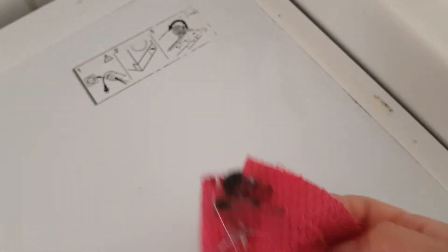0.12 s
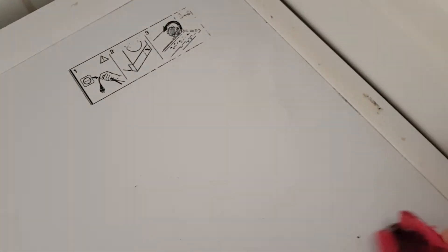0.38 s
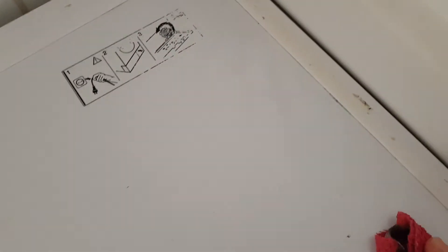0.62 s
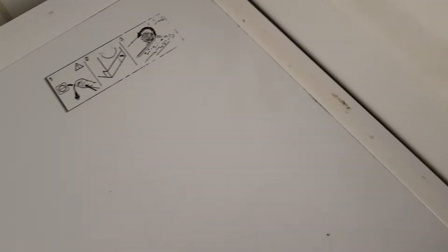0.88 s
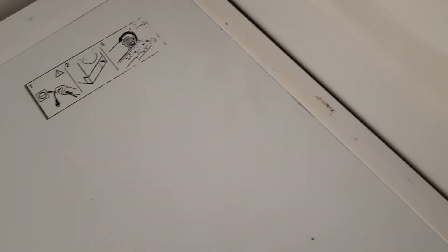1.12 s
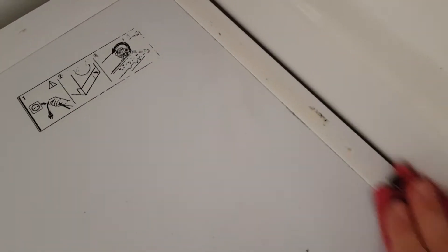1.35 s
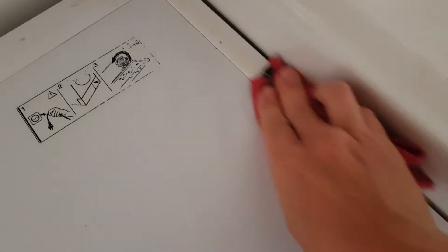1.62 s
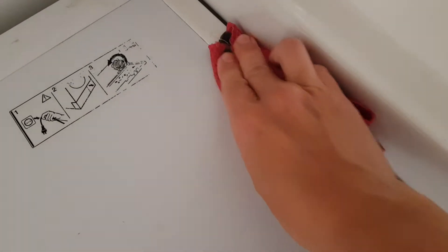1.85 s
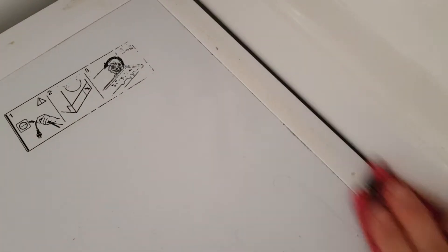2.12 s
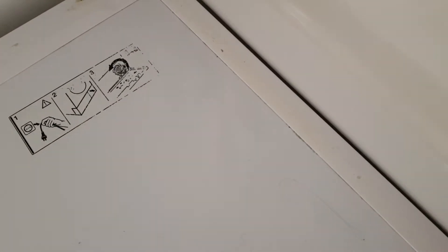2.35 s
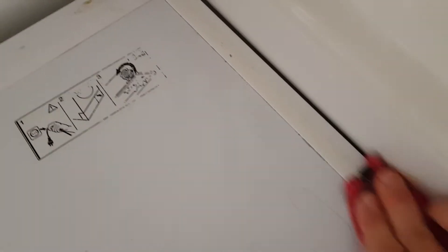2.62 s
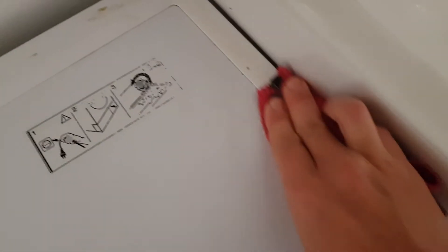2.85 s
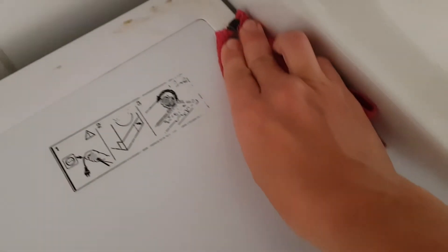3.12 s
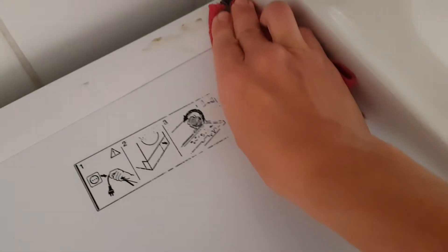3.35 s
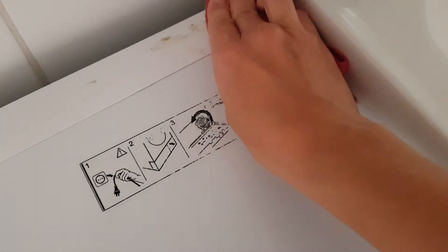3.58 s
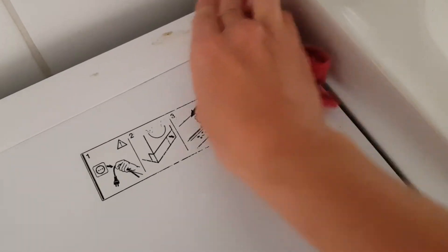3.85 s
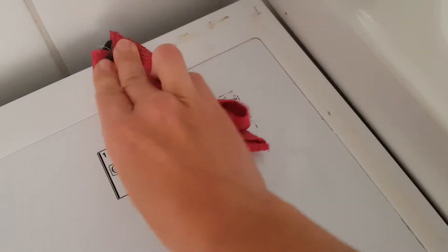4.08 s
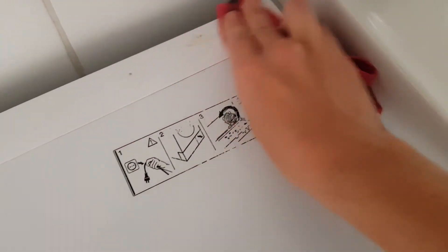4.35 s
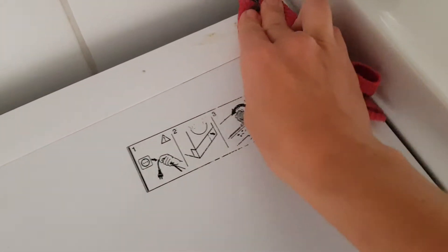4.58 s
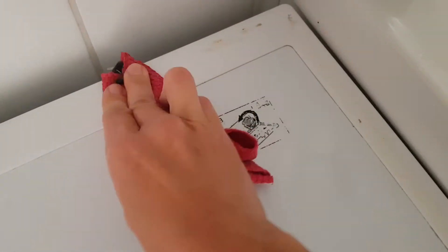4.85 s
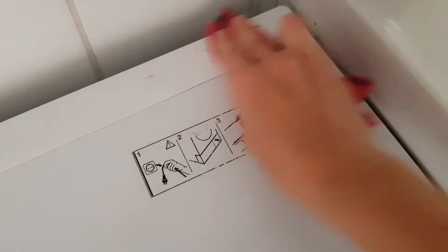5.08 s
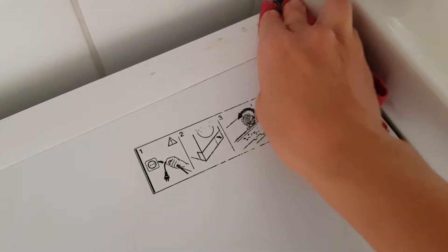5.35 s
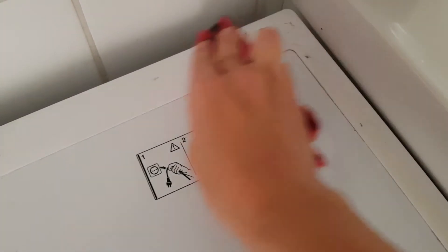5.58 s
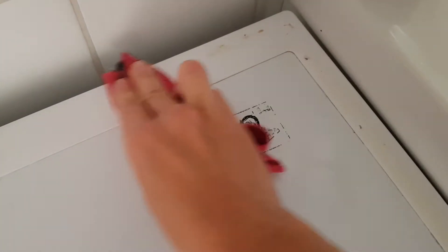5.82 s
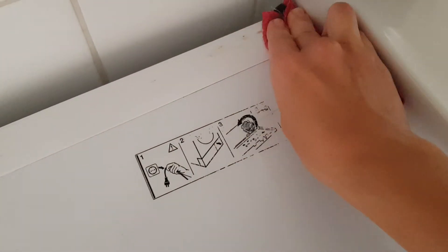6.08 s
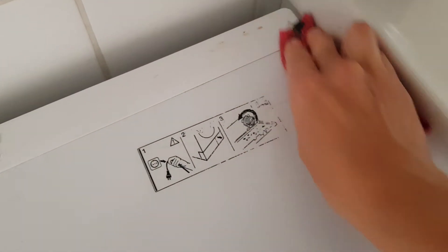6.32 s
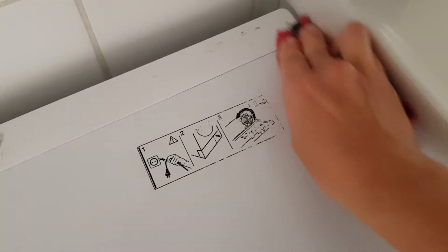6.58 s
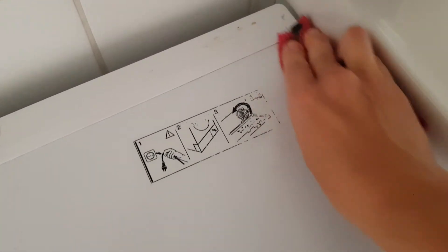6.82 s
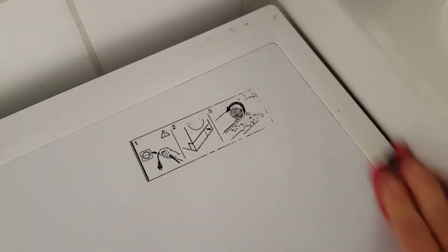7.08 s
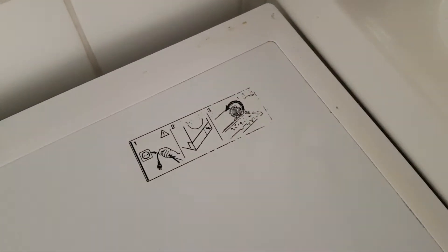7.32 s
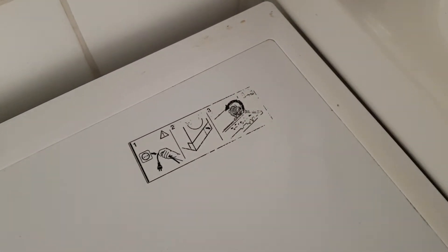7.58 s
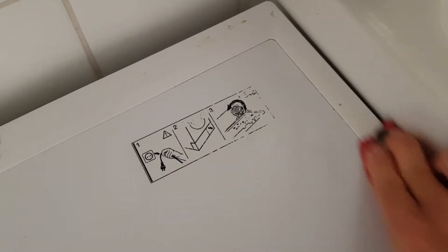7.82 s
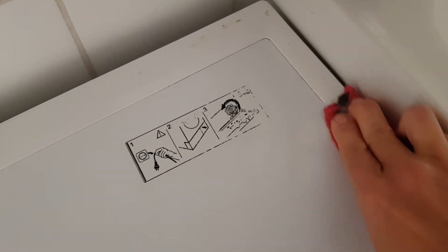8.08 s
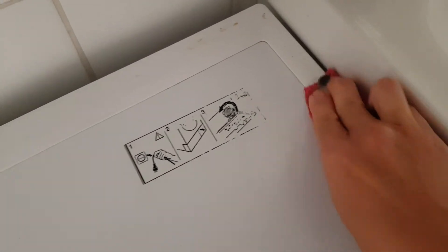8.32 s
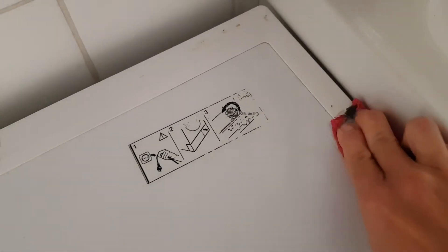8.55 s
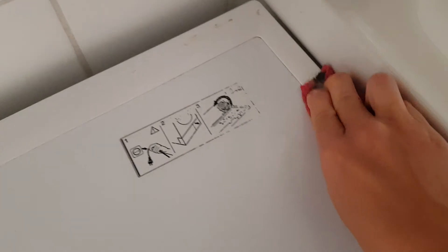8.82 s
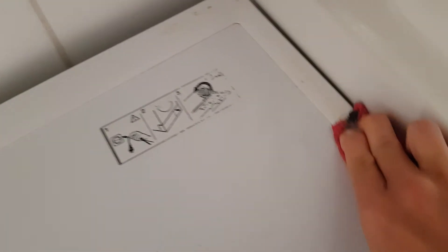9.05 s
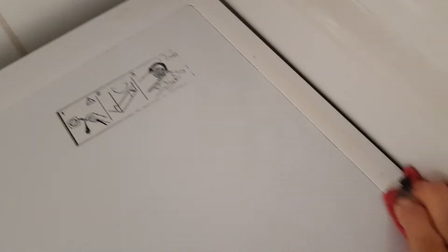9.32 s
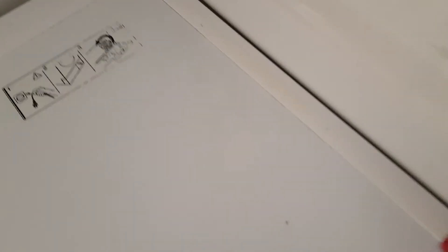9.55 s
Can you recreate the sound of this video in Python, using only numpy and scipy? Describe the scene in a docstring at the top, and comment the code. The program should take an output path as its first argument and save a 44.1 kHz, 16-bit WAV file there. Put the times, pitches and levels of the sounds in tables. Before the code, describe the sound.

A close hand-held stereo phone hears a cloth rubbing a machine's top panel indoors. Faint strokes soon become strong, dry hisses, dipping at each turn, over deep drum rumble and uneven laundry thumps. The heaviest thumps come around six to seven seconds; then the drum fades out and quiet, hollow, wavering rubs continue over faint hiss.

```python
"""First comes the low rumble of a laundry machine's drum, already turning, under the hiss of a scrubbing cloth.
Place: a small tiled room; a hand scrubs the machine's top panel. Microphone: a hand-held phone, two capsules.
Rumble and the load's drops (several a turn and uneven, the heaviest about once a turn) ring the cabinet's modes.
Each stroke is noise that swells with the hand's speed and falls quiet at its turn; a ledge echoes it from
about 20 cm of extra path. The drum coasts to a stop, and the cloth then rings the panel with a hollow tone."""
import sys
import numpy as np
from scipy import signal
from scipy.fft import rfft, irfft, next_fast_len
from scipy.io import wavfile
from scipy.ndimage import uniform_filter1d

SR = 44100
rng = np.random.default_rng(int(sys.argv[2]) if len(sys.argv) > 2 else 0)


def ratio(d):
    """dB to gain"""
    e = np.asarray(d, float) / 20
    return 10 ** e


def transcribe(u):
    """Save the signal u as a 16-bit wav file named by the first command-line argument.

    u: samples, shape (n,) or (channels, n), limited to [-1, 1]; the rate is SR.
    q: integer samples, one column per channel.
    """
    v = np.clip(np.atleast_2d(u).T, -1, 1)
    q = np.round(v * 32767).astype(np.int16)
    wavfile.write(sys.argv[1], SR, q)


N = 426883

T = np.arange(N) / SR
SIZE = next_fast_len(N + SR)
HZ = np.maximum(np.fft.rfftfreq(SIZE, 1 / SR), 1)


def through(x, response):
    """Filter by a frequency response."""
    return irfft(rfft(x, SIZE) * response, SIZE)[..., :N]


def shape(points):
    """Gain of (f/Hz, level/dB) points on a log-frequency axis."""
    hz, db = np.transpose(points)
    return ratio(np.interp(np.log(HZ), np.log(hz), db))


def modes(table):
    """Response of damped resonances (f/Hz, width/Hz, level/dB); neighbours alternate in sign."""
    response = 0
    for k, (hz, width, db) in enumerate(table):
        damping = 1j * HZ * width
        response = response + (-1) ** k * ratio(db) * damping / (hz ** 2 - HZ ** 2 + damping)
    return response


def unit(response):
    """Scale a response so that white noise comes out at rms 1."""
    return response / np.sqrt(np.mean(np.abs(response) ** 2))


def curves(table):
    """Columns after t/s, one value a sample."""
    s, *columns = np.transpose(table)
    return [np.interp(T, s, column) for column in columns]


def flicker(rate, depth_db):
    """A gain of rms 1 whose level wanders rate times a second."""
    k = int(SR / rate)
    held = np.repeat(rng.standard_normal(N // k + 1), k)[:N]
    gain = ratio(depth_db * uniform_filter1d(held, k))
    return gain / np.sqrt(np.mean(gain ** 2))


# sound that the two capsules do not share: (f/Hz, level/dB relative to the shared part)
UNSHARED = [(40, -6), (125, -24.5), (250, -10), (500, -8), (1000, -2.5), (2000, -2.5)]


def pair(drive, response):
    """Noise under one envelope: a part that both microphones share and a part that they do not."""
    shared, unshared = rng.standard_normal((2, N)) * drive
    side = through(unshared, response * shape(UNSHARED))
    return through(shared, response) + side * np.array([[1], [-1]])


def blows(times, gains, push_s):
    """Soft half-sine pushes; the longer the contact, the duller the blow."""
    hits = np.zeros(N)
    hits[(np.asarray(times) * SR).astype(int)] = gains
    length = int(push_s * SR)
    push = np.sin(np.pi * np.arange(length) / length)
    return signal.fftconvolve(hits, push)[:N]


# load dropping in the drum: (t/s, upper-mode level/dB before trims, low-mode relative level/dB, fall/s)
DROPS = [(0.04, -29.5, 6, 0.047), (0.155, -28.5, 1, 0.032), (0.3, -34.5, 11.5, 0.029),
         (0.822, -30.5, 9.5, 0.096), (0.85, -25, 6, 0.041), (1.157, -28.5, -5, 0.016),
         (1.335, -29.5, 5, 0.04), (1.47, -30.5, 3, 0.047), (1.938, -24, 3.5, 0.11),
         (2.63, -32.5, 5.5, 0.065), (3.054, -26, 6, 0.047), (3.077, -24.5, 5, 0.064),
         (4.139, -20, -1, 0.12), (4.238, -25, -5, 0.036), (4.735, -27, -10, 0.03),
         (5.122, -26.5, -7, 0.023), (5.316, -22, 1.5, 0.091), (5.419, -29, 10, 0.023),
         (5.669, -31.5, 7, 0.076), (5.736, -23, 0, 0.034), (6.37, -17.5, 3.5, 0.041),
         (6.426, -28.5, -5, 0.073), (6.52, -27.5, 2, 0.027), (6.612, -27.5, 0, 0.029),
         (6.67, -25.5, -13, 0.025), (6.889, -32, -9, 0.13), (7.11, -35, 12, 0.044),
         (7.331, -22.5, -9, 0.064), (7.382, -19, -0.5, 0.066), (7.787, -39.5, -1, 0.054)]
# low cabinet resonances: (f/Hz, width/Hz, level/dB)
CABINET_LOW = [(95.8, 4.5, -14.5), (130.7, 6.5, -0.5), (163.6, 9.5, -3), (183.2, 9.8, 1), (214.5, 13.2, -2),
               (245, 35.6, -7.5), (299.5, 33.6, -8.5), (325.7, 17, -8.5)]
# upper cabinet resonances: (f/Hz, width/Hz, level/dB)
CABINET_HIGH = [(363.5, 23.6, 1), (431, 34, -0.5), (493.6, 15.5, 2.5), (550, 19.2, -1), (601.5, 38.6, -1),
                (683, 38.5, -1.5), (728, 26, 1), (848, 62.8, -4.5)]
# low modes swelling as the load shifts: (t/s, relative level/dB)
LOW_SWELL = [(0, 0), (1, 1), (2.3, -2), (3.3, 3), (4.5, -0.5), (5.5, 2), (6.2, 0), (6.75, 2), (7.2, 0),
             (7.6, 1)]
# drum coasting to a stop, which also governs scuffing and cloth rattle: (t/s, level/dB)
COAST = [(7.3, 2.5), (7.6, -4.5), (7.86, -5.5), (8.19, -32), (8.4, -29), (8.6, -60)]


def drum():
    """Tumbling load and rollers knock the cabinet unevenly; a drop is one blow and then a burst of knocks."""
    rumble_db, upper_db = -44.5, -3.5  # before the coasting curve; upper modes relative
    turning = ratio(rumble_db + curves(COAST)[0])
    low = ratio(curves(LOW_SWELL)[0]) * turning * flicker(9.7, depth_db=3.5)
    high = ratio(upper_db) * turning * flicker(30, depth_db=2.0)
    for s, db, rel_db, fall_s in DROPS:
        age = np.maximum(T - s, 0)
        burst = ratio(db - 10) * (age > 0) * np.exp(-age / max(fall_s, .005))
        low = np.hypot(low, ratio(rel_db) * burst)
        high = np.hypot(high, burst)
    knocks = flicker(400, depth_db=4.0)
    # soft laundry cannot drive the cabinet's treble
    soft = shape([(850, -8), (1100, 0.0), (4000, -28.0)])
    lower = unit(modes(CABINET_LOW) * soft)
    upper = unit(modes(CABINET_HIGH) * soft)
    s, db, rel_db, _ = np.transpose(DROPS)
    low_blows = through(blows(s, ratio(db + rel_db - 16.5), push_s=0.0012), lower)
    high_blows = through(blows(s, ratio(db - 12.5), push_s=0.00083), upper)
    return pair(low * knocks, lower) + pair(high * knocks, upper) + low_blows + high_blows


# hollow middle resonances scuffed by the load: (f/Hz, width/Hz, level/dB)
SCUFF_MODES = [(1303, 155, 1), (2030, 614, -8), (2356, 630, -9)]


def scuff():
    """Rough dragging of the load that rings the hollow middle resonances, catching in small jerks."""
    scuff_db = -60  # before the coasting curve
    drive = ratio(scuff_db + curves(COAST)[0]) * flicker(40, depth_db=3.0) * flicker(600, depth_db=1.0)
    dull = shape([(2700, -19.0), (3600, -18.0), (7000, -25)])
    return pair(drive, unit(modes(SCUFF_MODES) * dull))


# cloth strokes: (start t/s, end t/s, hiss level/dB at mid-stroke,
#                 fine fibres' relative level/dB, swell from start to end/dB)
STROKES = [(-0.3, 0.323, -71.5, -2, -13), (0.33, 0.54, -82, -3, 4), (0.498, 0.64, -65, 1, 0),
           (0.6, 0.9, -65, 0.5, -1), (0.926, 1.063, -62.5, -2, 0), (1.1, 1.825, -57.5, -3, 4),
           (1.889, 2.368, -56.5, -3.5, -5.5), (2.383, 3.46, -60, -0.5, -5), (3.355, 3.712, -67.5, -2.5, 0),
           (3.74, 3.832, -63, 3.5, 0), (3.818, 4.124, -60.5, 2.5, 2), (4.128, 4.458, -60.5, 2, 7),
           (4.572, 4.923, -61.5, 2.5, -1), (4.93, 5.238, -59, 1.5, 10), (5.298, 5.45, -68, 4.5, -8),
           (5.44, 5.808, -62, 1.5, -2), (5.787, 6.157, -61.5, 2.5, 5.5), (6.215, 6.536, -63.5, -0.5, 5),
           (6.48, 6.738, -62, 0, 0), (6.71, 7.11, -62.5, 0.5, 12), (7.022, 7.46, -60, 2, -12.5),
           (7.478, 8.007, -61.5, 3, -2), (8.03, 8.21, -74.5, 11.5, 0), (8.18, 8.401, -71.5, 9, 11),
           (8.397, 8.622, -72.5, 10.5, -8), (8.603, 8.784, -66.5, 2.5, -2), (8.78, 10, -69.5, 6.5, 9)]


def strokes():
    """Gains of weave, fibres and panel ring: each stroke speeds up, travels and slows to its turn."""
    speed_up_s = 0.095  # the hand gathers and loses speed
    # sound grows as speed to these powers; the hollow ring needs more speed than the hiss
    weave_law, fibre_law, ring_law = 1.02, 0.88, 1.8
    # the resting cloth shivers while the drum turns; fine fibres relative
    rattle_db, rattle_fine_db = -80, 6
    weave_power = ratio(rattle_db + curves(COAST)[0]) ** 2
    fine_power = weave_power * ratio(rattle_fine_db) ** 2
    ring_power = np.zeros(N)
    for start, end, db, fine_db, swell_db in STROKES:
        on = slice(max(int(start * SR), 0), int(end * SR))
        t = T[on]
        speed = np.clip(np.minimum(t - start, end - t) / speed_up_s, 0, 1)
        travel = (t - start) / (end - start)
        power = ratio(db + swell_db * (travel - .5)) ** 2
        weave_power[on] += power * speed ** (2 * weave_law)
        fine_power[on] += power * ratio(fine_db) ** 2 * speed ** (2 * fibre_law)
        ring_power[on] += power * speed ** (2 * ring_law)
    return np.sqrt(weave_power), np.sqrt(fine_power), np.sqrt(ring_power)


# colour of the coarse weave on the panel: (f/Hz, relative level/dB per Hz)
WEAVE = [(500, -19), (1500, -2.5), (2500, -0.5), (3100, -2.5), (4600, -0.5), (6900, -3.5), (9000, -5),
         (15500, -35)]
# colour of the fine fibres: (f/Hz, relative level/dB per Hz)
FIBRES = [(3000, -26), (6000, -8), (8300, -1.5), (11400, 1.5), (13000, 0), (15500, -2)]


def cloth(weave, fine):
    """Countless fibres slip at once: a dense hiss, slightly grainy where the weave catches."""
    catch = flicker(25, depth_db=0.87) * flicker(300, depth_db=0.5)
    return pair(catch * weave, unit(shape(WEAVE))) + pair(catch * fine, unit(shape(FIBRES)))


def ledge(rub):
    """Nearby ledges faintly reflect the rubbing; as the hand travels each microphone's lag drifts."""
    echo_share, lag_s = .3, 0.000601  # typical lag, about 20 cm of extra path
    echo = np.array([np.interp(T - lag_s * flicker(4, depth_db=4.5), T, side) for side in rub])
    return (rub + echo_share * echo) / np.hypot(1, echo_share)


# deep wobble of panel and hand: (t/s, level/dB before the left-right tilt)
SHAKE = [(0, -50), (2, -53), (6.2, -53), (7.7, -51.5), (8, -60.5), (8.6, -54), (9.2, -61), (9.68, -53)]
# resonances of the wobble: (f/Hz, width/Hz, level/dB)
SHAKE_MODES = [(48.8, 9.9, -2.5), (92.7, 21.4, -2.5), (175, 105, -18)]
# bumps of the hand: (t/s, level/dB before trims, ring f/Hz)
BUMPS = [(0.638, -39, 45.8), (0.769, -34, 72.7), (1.059, -26.5, 89.5), (1.109, -29, 94), (6.112, -39, 57.5)]


def shake():
    """Deep wobble of panel and hand, stronger at the left microphone; a bump rings a few slow cycles."""
    wobble = pair(ratio(curves(SHAKE)[0]) * flicker(7, depth_db=3.5), unit(modes(SHAKE_MODES)))
    for s, db, hz in BUMPS:
        age = np.maximum(T - s, 0)
        envelope = (1 - np.exp(-age / 0.0092)) * np.exp(-age / 0.028)
        wobble = wobble + ratio(db + 4.0) * envelope * np.sin(2 * np.pi * hz * age)
    return wobble * ratio(np.array([[.8], [-.8]]))


# quiet room and microphone hiss: (f/Hz, level/dB per Hz)
FLOOR = [(100, -94), (300, -101), (800, -112), (3000, -118), (7000, -122), (9000, -114), (15500, -114)]


def floor():
    """Steady faint hiss of the quiet room and the microphones."""
    return pair(np.sqrt(SR / 2), shape(FLOOR))


def snaps(table, decay_s, spread):
    """Noise bursts that start at once, die away quickly and centre on their own pitch."""
    out, age = np.zeros((2, N)), np.arange(SR // 5) / SR
    noises = rng.standard_normal((len(table), 2, len(age)))
    for (s, db, hz), noise in zip(table, noises):
        band = [hz / spread, min(hz * spread, 16000)]
        sos = signal.butter(2, band, "bandpass", fs=SR, output="sos")
        burst = signal.sosfilt(sos, noise * np.exp(-age / decay_s))
        at = int(s * SR)
        out[:, at:at + len(age)] += ratio(db) * burst / np.abs(burst).max()
    return out


# short scrapes where something catches: (t/s, peak level/dB, f/Hz)
SCRAPES = [(0.2356, -44, 1500), (0.775, -48, 2600), (1.166, -45.5, 1500), (1.253, -45, 1800),
           (1.9431, -43, 1350), (2.3293, -43, 1390), (3.242, -39, 1300), (3.275, -44, 2300),
           (3.8933, -44, 1500), (4.243, -37.5, 1350), (5.3323, -37, 1600), (6.3125, -35, 1970),
           (6.372, -34, 1400), (7.0462, -42, 1800), (7.0918, -42, 1300), (7.2501, -45, 2000),
           (7.3884, -33.5, 1300)]
# crumbs of residue snapping off: (t/s, peak level/dB before a 4.5 dB lift, f/Hz)
TICKS = [(0.5177, -53, 10100), (1.0605, -42.5, 8100), (3.7888, -48, 10000), (5.1871, -37, 11500),
         (6.4282, -36, 9020), (8.4412, -51, 11700)]


def scrapes_and_ticks():
    """Catches scrape low and long; crumbs snap bright within a few milliseconds."""
    scrapes = snaps(SCRAPES, decay_s=0.04, spread=1.34)
    ticks = ratio(4.5) * snaps(TICKS, decay_s=0.0036, spread=1.5)
    return scrapes + ticks


# cloth dragging once the drum rests: (t/s, hollow ring level/dB relative to the hiss,
#                                      extra level/dB of the upper rings)
DRAG = [(7.95, -2, 2), (8.33, 1, -5), (8.5, 5.5, -6), (8.7, 2.5, 0), (8.86, 6.5, -7), (9.03, 7.5, -3),
        (9.15, -2, 6), (9.4, -14, 17), (9.68, -2, 1)]
# hollow rings of the panel: (f/Hz, width/Hz, level/dB)
PANEL = [(510, 450, -15), (890, 85, -11), (1350, 120, 4), (1470, 78, -6), (1970, 180, -8),
         (2340, 200, -11.5), (3460, 540, -15.5)]


def drag(ring):
    """The moving hand shifts which resonance of the panel speaks, so each wavers on its own."""
    split_hz = 1400  # the upper rings lie above this
    ring_db, upper_db = curves(DRAG)
    level = ring * ratio(ring_db) * (T > DRAG[0][0])
    scale = np.sqrt(np.mean(np.abs(modes(PANEL)) ** 2))
    out = np.zeros((2, N))
    for mode in PANEL:
        waver = ratio(upper_db * (mode[0] > split_hz)) * flicker(7.2, depth_db=1.8)
        out += pair(level * waver, modes([mode]) / scale)
    return out


def scene():
    """All sources together; only the rubbing is reflected by the ledges."""
    weave, fine, ring = strokes()
    rubbing = ledge(cloth(weave, fine) + drag(ring))
    return drum() + scuff() + rubbing + shake() + floor() + scrapes_and_ticks()


def low_pass(x):
    """Removes everything above the highest recorded frequency."""
    return signal.sosfilt(signal.butter(12, 15810, fs=SR, output="sos"), x)


# colour difference of the two capsules: (f/Hz, left minus right level/dB)
LEAN = [(30, 2), (125, 1), (300, -0.5), (1200, -2.5), (4000, -5), (6500, -7.5), (9000, 4.5), (14000, 0)]


def record(dry):
    """The microphones differ in colour and sit apart, so the left hears a little later; deep bass is cut."""
    left_lag_s = .0001
    lean = np.sqrt(shape(LEAN))  # half the difference on each side
    cut = shape([(20, -17), (45, 0.5)])
    left = through(dry[0], cut * lean * np.exp(-2j * np.pi * HZ * left_lag_s))
    right = through(dry[1], cut / lean)
    return low_pass(np.array([left, right]))


dry = scene()
out = record(dry)
transcribe(out)
```